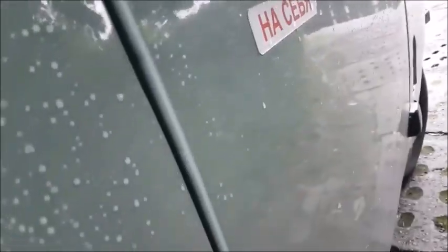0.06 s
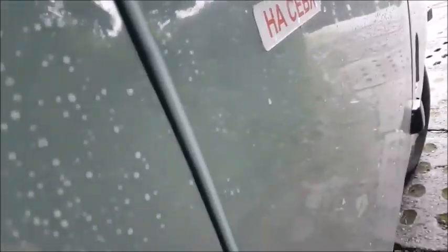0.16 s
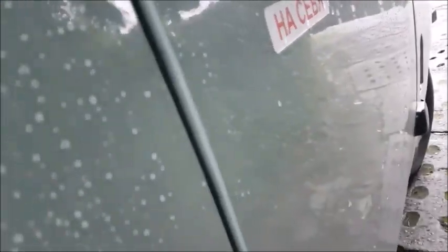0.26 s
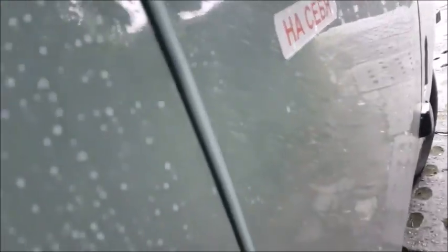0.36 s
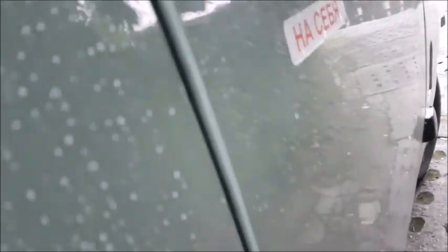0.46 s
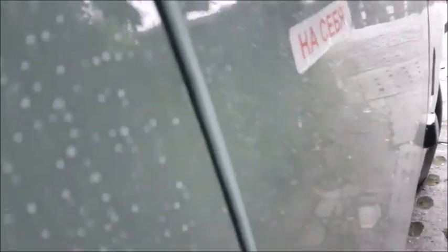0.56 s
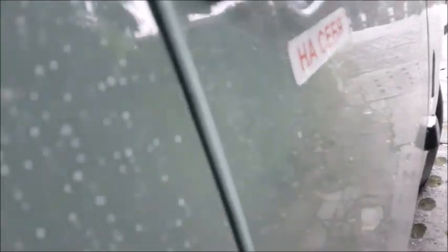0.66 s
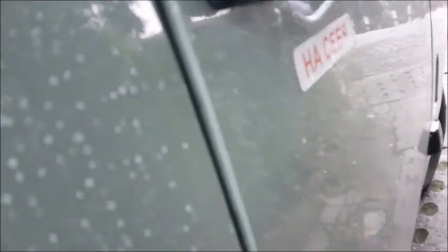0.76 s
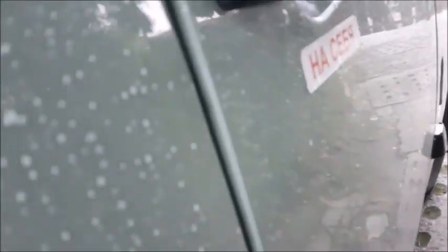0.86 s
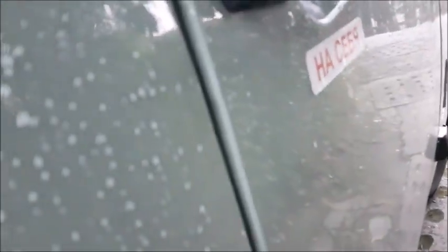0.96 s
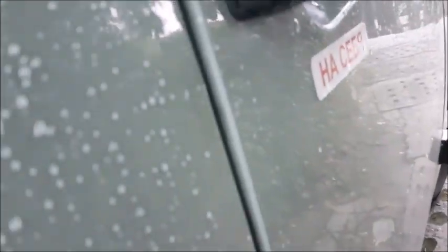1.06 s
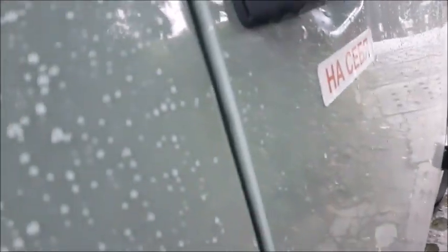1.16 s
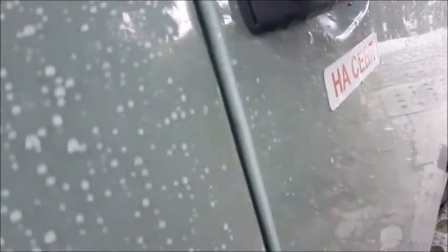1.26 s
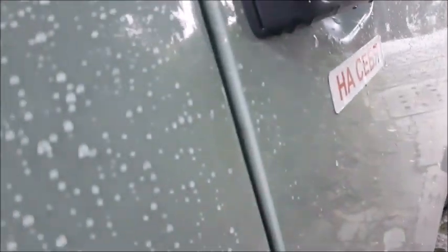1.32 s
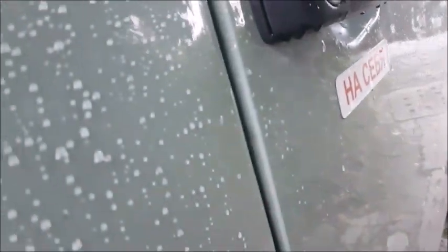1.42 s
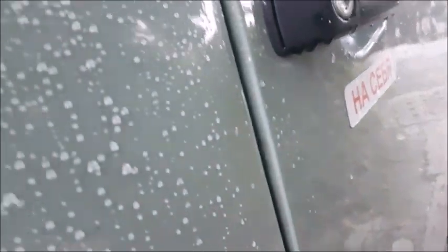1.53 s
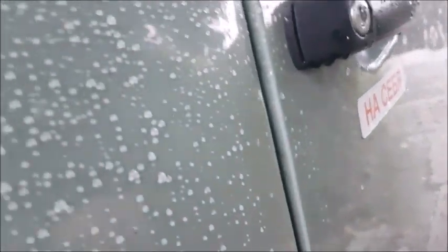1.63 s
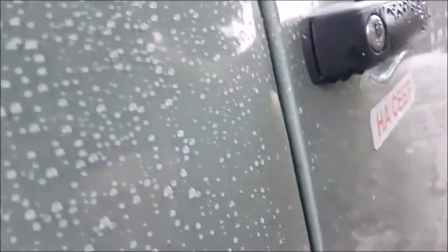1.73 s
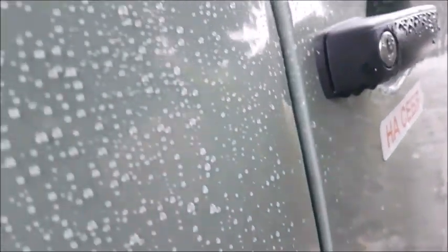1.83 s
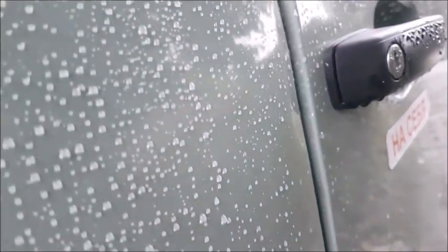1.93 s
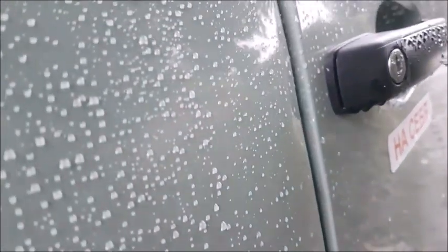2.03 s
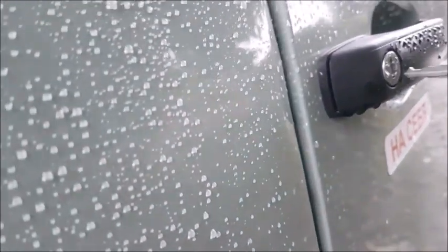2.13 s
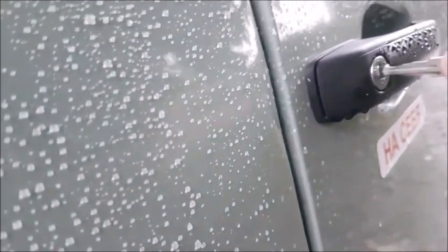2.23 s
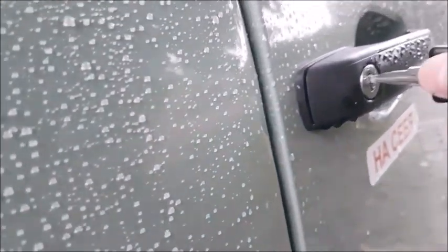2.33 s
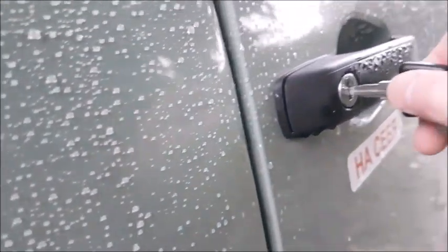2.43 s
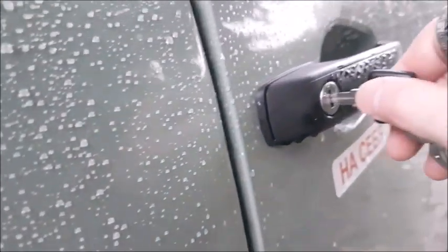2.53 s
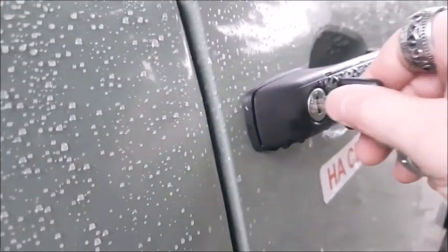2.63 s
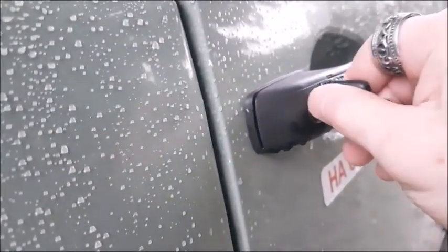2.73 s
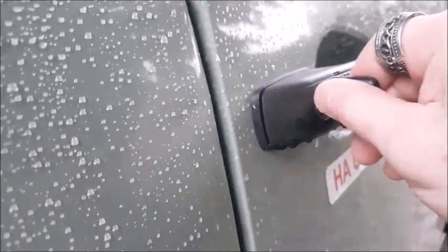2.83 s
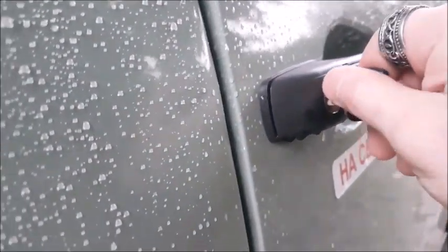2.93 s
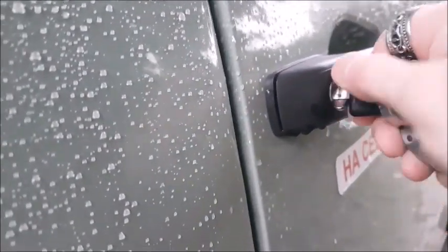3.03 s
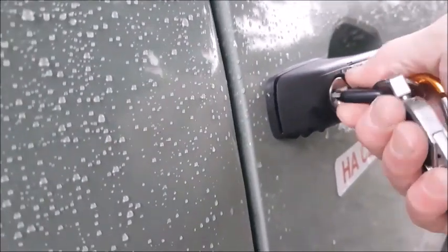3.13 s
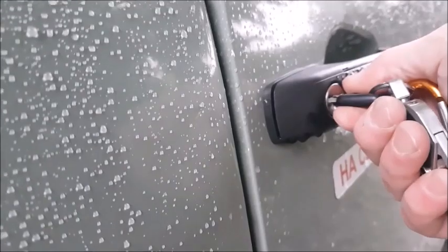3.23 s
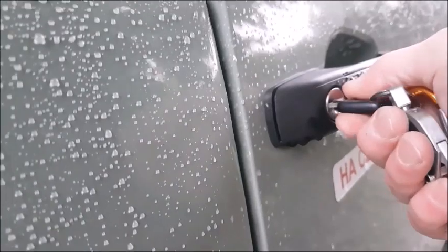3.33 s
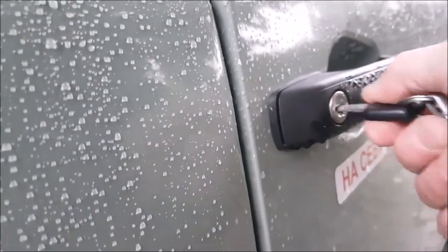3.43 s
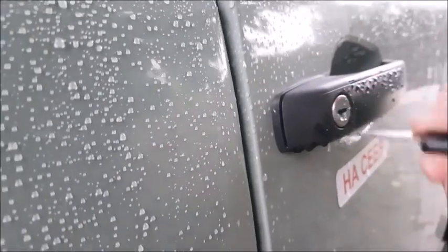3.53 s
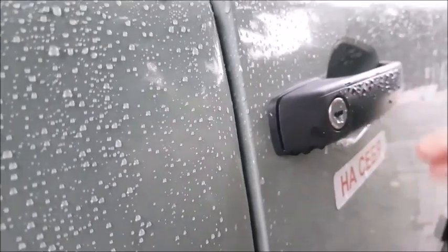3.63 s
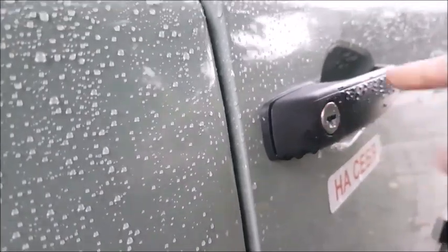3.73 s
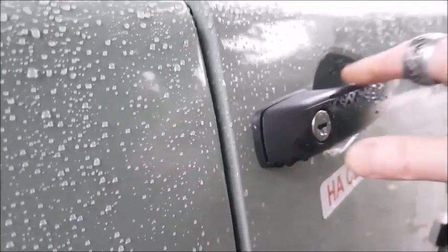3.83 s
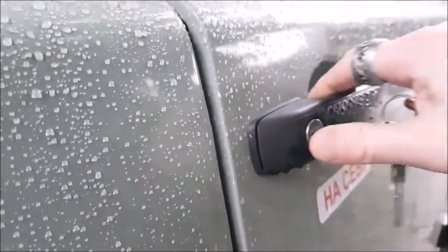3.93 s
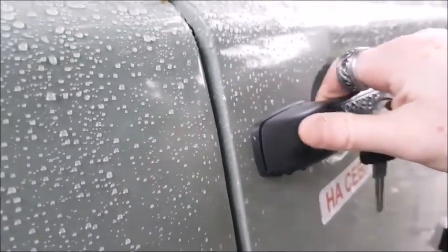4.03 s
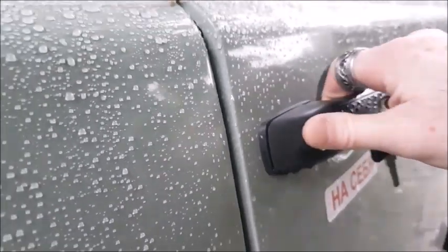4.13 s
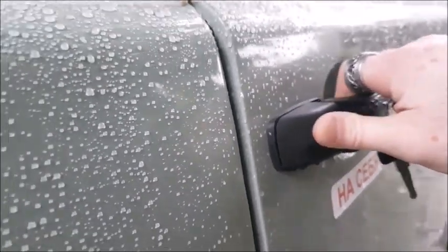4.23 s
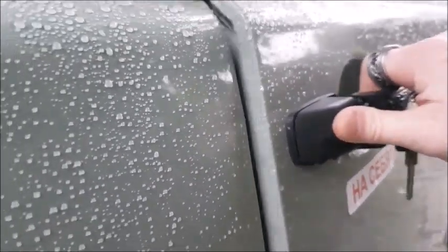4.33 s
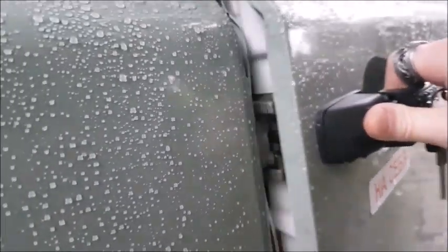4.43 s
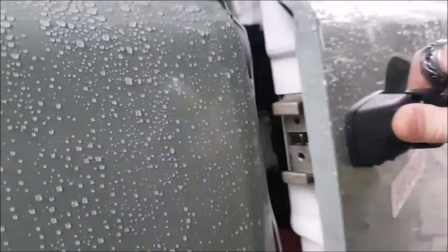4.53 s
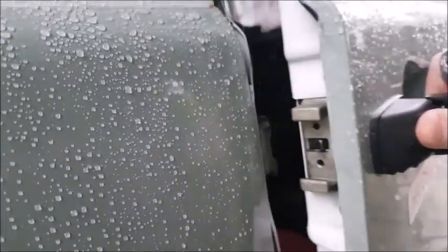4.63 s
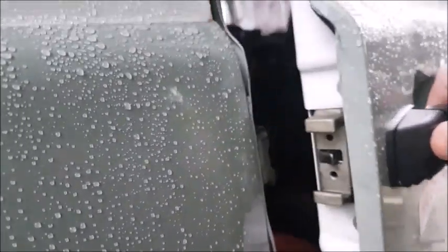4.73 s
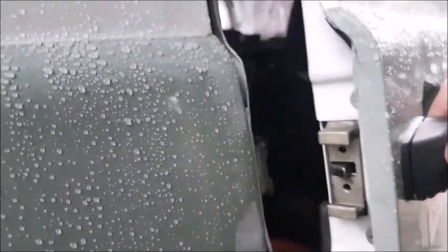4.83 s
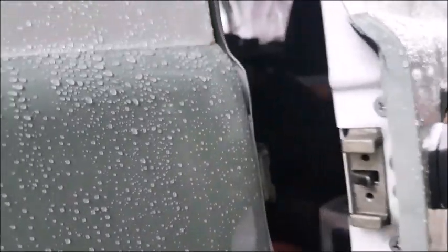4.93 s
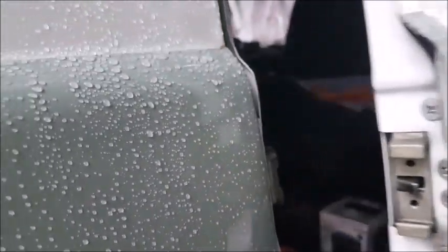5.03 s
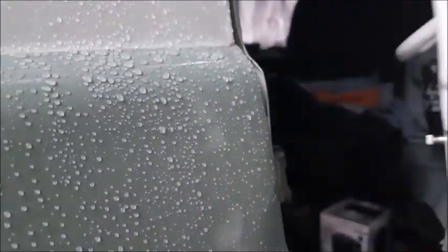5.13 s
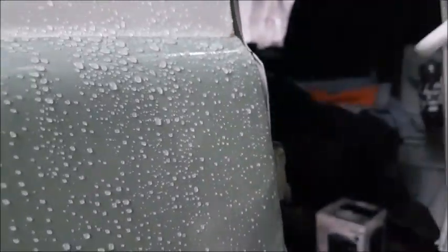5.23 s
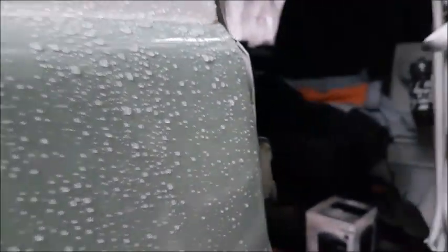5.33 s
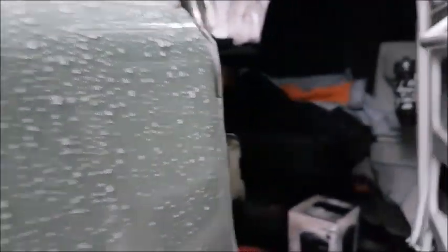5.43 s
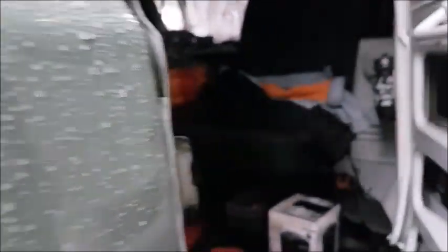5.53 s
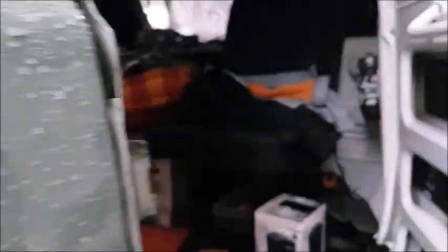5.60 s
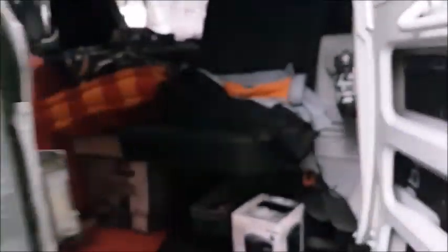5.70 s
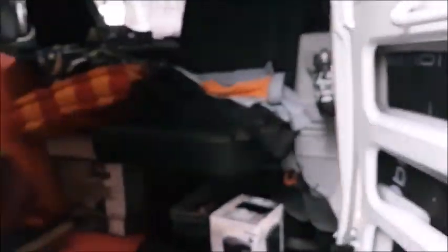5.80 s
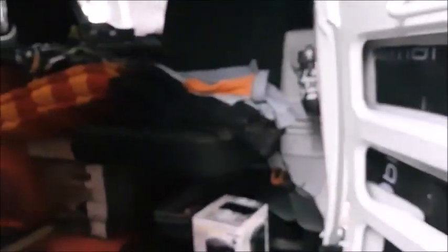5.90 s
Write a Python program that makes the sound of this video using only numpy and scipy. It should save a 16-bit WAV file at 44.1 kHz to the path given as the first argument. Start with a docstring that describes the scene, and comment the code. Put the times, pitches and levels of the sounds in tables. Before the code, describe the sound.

Outdoors over a low hum, a bunch of keys tinkles, a lock snaps hard, and a van door's latch clunks loose with rattles.

```python
"""A van's rear door outdoors: a key slides into its lock, turns and is pulled out, the handle is squeezed,
the latch clunks free and the door swings open. Blows ring the sheet-metal modes; small slips make the rubbing.
Before that a bunch of keys jingles, each touch a crack and a rattle ringing the keys' modes.
Faint swelling bands of noise make whistles, swishes and a blurred ring of the keys;
a low hum, a faint hiss and a few thin tones fill the background."""
import sys
import numpy as np
from scipy import signal
from scipy.fft import rfft, irfft
from scipy.io import wavfile
from scipy.ndimage import uniform_filter1d

SR = 44100
rng = np.random.default_rng(int(sys.argv[2]) if len(sys.argv) > 2 else 0)


def wav_record(signal):
    """Record a signal, one row per channel, as 16-bit PCM in the file named by sys.argv[1]."""
    frames = np.transpose(np.atleast_2d(signal))
    bounded = np.clip(frames, -1, 1)
    # unit amplitude maps onto the largest positive 16-bit level
    quanta = np.round(bounded * 32767).astype(np.int16)
    wavfile.write(sys.argv[1], SR, quanta)


N = 262836
TIME = np.arange(N) / SR  # s


def gain_of(db):
    """Turns dB into an amplitude factor."""
    return 10 ** (np.asarray(db) / 20)


def evened(x):
    """Brings a signal to an RMS of one."""
    return x / np.sqrt(np.mean(x ** 2) + 1e-20)


def read(points, hz):
    """Reads a curve of (Hz, value) points along a logarithmic pitch axis."""
    point_hz, value = np.transpose(points)
    return np.interp(np.log(hz + 1), np.log(point_hz + 1), value)


def at(points, seconds):
    """Reads a curve of (seconds, value) points along time."""
    return np.interp(seconds, *np.transpose(points))


def coloured(x, points):
    """Filters by a spectrum in dB."""
    hz = np.fft.rfftfreq(x.shape[-1], 1 / SR)
    return irfft(rfft(x) * gain_of(read(points, hz)), x.shape[-1])


def add(mix, start_s, pair, pan_db):
    """Lays a stereo sound into the mix, tilted by a left-right level difference."""
    part = mix[:, round(start_s * SR):][:, :pair.shape[1]]
    panned = pair * gain_of([[pan_db / 2], [-pan_db / 2]])
    part += panned[:, :part.shape[1]]


def pair_of(a, b, likeness):
    """The right port hears the left's signal by its likeness, and an independent one for the rest."""
    likeness = np.clip(likeness, 0, 1)
    return np.array([a, likeness * a + np.sqrt(1 - likeness ** 2) * b])


def fuzzy_tone(hz, width_hz, steady=0):
    """Noise through a narrow resonance that follows hz, around a steady core."""
    turn = np.exp(2j * np.pi * np.cumsum(hz) / SR)
    decay = np.exp(-np.pi * width_hz / SR)
    slow = rng.standard_normal(len(hz)) + 1j * rng.standard_normal(len(hz))
    for _ in range(2):
        slow = signal.lfilter([1 - decay], [1, -decay], slow)
    return evened((turn * (steady + slow / np.std(slow))).real)


# Blows on lock, handle and latch. Each row: start in seconds, then relative levels in dB of
# the middle (2 kHz), treble (7.5 kHz), body (500 Hz) and bass (120 Hz).
KNOCKS = [(2.246, -29.5, -35.5, -38.5, -36), (2.277, -34, -50, -42, -54), (2.2995, -45, -52, -39, -48),
          (2.377, -37.5, -76, -36, -53), (2.5306, -38.5, -57, -36.5, -59), (2.545, -47, -61, -45, -46),
          (2.5805, -36, -69, -48, -54), (2.5948, -65, -42, -58, -48.5), (2.7315, -25, -22, -21.5, -54),
          (2.7413, -5, -24, -17.5, -30), (2.7592, -20, -43, -24.5, -44), (2.8023, -23.5, -20.5, -37, -46),
          (2.811, -53.5, -29.5, -55, -58), (2.931, -42, -49.5, -49, -64), (2.9536, -41.5, -52, -40, -52),
          (3.0256, -48, -53, -74, -34.5), (3.1228, -35, -54, -41, -47), (3.2696, -50, -57, -64, -41),
          (3.2849, -44.5, -52.5, -44, -47), (3.3339, -43.5, -54, -52, -33), (3.3402, -30.5, -88, -30, -67),
          (3.4123, -25, -61, -32.5, -43), (3.4782, -34, -61, -36.5, -40.5), (3.5013, -26, -57, -36, -33.5),
          (3.5223, -37, -38, -38, -35), (3.5441, -37, -38, -49, -41.5), (3.6217, -43, -44.5, -76.5, -54),
          (3.7278, -46.5, -48.5, -76, -54.5), (3.8705, -47, -69, -61, -33.5),
          (3.969, -41, -75, -43.5, -50.5), (4.109, -25, -37.5, -76, -49), (4.1315, -43.5, -49, -38, -62),
          (4.144, -17, -44, -25, -67), (4.1603, -41, -60, -30.5, -43.5), (4.2017, -23.5, -40.5, -21, -20.5),
          (4.2808, -26.5, -56.5, -33.5, -31), (4.2959, -20, -45, -25, -14.5), (4.3086, -7, -24, -19, -18),
          (4.3155, -30, -28, -40, -40), (4.3254, -21, -40.5, -20.5, -24.5), (4.375, -27.5, -49, -31, -27.5),
          (4.3912, -28.5, -39.5, -32, -33.5), (4.4195, -56, -54, -48.5, -29),
          (4.4574, -45, -51, -37.5, -37.5), (4.5332, -45.5, -59.5, -36.5, -42),
          (4.7183, -19, -37.5, -39.5, -41.5), (4.8028, -37, -63, -39, -39.5),
          (4.8813, -26, -41, -46, -44.5), (4.909, -41, -73, -42, -58), (5.685, -41.5, -57, -51, -69),
          (5.8202, -42, -58, -46, -51), (5.8276, -40.5, -65, -38, -38)]
# Strong modes of the door. Each row: pitch in Hz, boost in dB.
DOOR_MODES = [(75, 0), (115, 5), (150, 7), (195, 11), (258, -14), (315, -4), (465, 11.5), (525, 6),
              (615, 10.5), (812, -2), (1150, 8), (1700, 0), (2240, 0)]
# Strength of the sheet metal's modes over pitch. Each row: pitch in Hz, relative level in dB.
PANEL_SPECTRUM = [(30, -9), (60, -5.5), (100, -5.5), (400, -5.5), (1200, -7), (2200, -4.5), (3000, -7),
                  (4300, 2), (5500, 2), (8000, 6.5), (10500, -5), (14000, 0)]
# Decay of the crack, and of the ring after it. Each row: pitch in Hz, time to fall 60 dB in seconds.
CRACK_T60 = [(30, 0.32), (200, .08), (700, 0.033), (2000, 0.013), (5000, 0.0058), (15000, 0.014)]
RING_T60 = [(30, 0.13), (200, 0.58), (700, 0.26), (2000, 0.1), (5000, 0.07), (15000, 0.085)]
# Ringing after the crack, more once the door hangs free. Each row: time in seconds, ring in dB.
RINGING = [(2.2, -16.5), (2.8, -16.5), (3.1, -7), (4.1, -12), (4.45, -7.5), (4.7, -3.5), (5.96, -3.5)]
# Where the blows sit. Each row: time in seconds, left over right in dB.
KNOCK_PAN = [(2.2, -3), (2.8, 1), (4.0, -1.5), (4.31, 1), (4.45, -5), (4.75, 1), (5.96, -4.5)]


def door():
    """The sheet metal has strong modes and a dense crowd of others; each blow cracks, rings and lands elsewhere."""
    out, t = np.zeros((2, N)), np.arange(SR // 3) / SR
    crowd_hz = np.geomspace(28, 15800, num=420) * rng.uniform(0.97, 1.01, size=420)
    strong_hz, strong_db = np.transpose(DOOR_MODES)
    hz = np.r_[crowd_hz, strong_hz]
    mode_db = read(PANEL_SPECTRUM, hz) + np.r_[0 * crowd_hz, strong_db]
    modes = gain_of(mode_db)[:, None] * np.sin(2 * np.pi * hz[:, None] * t)
    build_s = read([(60, 0.0091), (600, 0.00053), (5000, 0.00034)], hz)  # bass builds slowly
    modes *= 1 - np.exp(-t / build_s[:, None])
    crack = modes * gain_of(-60 * t / read(CRACK_T60, hz)[:, None])
    ring = modes * gain_of(-60 * t / read(RING_T60, hz)[:, None])
    likeness = read([(100, 1.0), (1000, 0.73), (5000, 0.48)], hz)
    fade = signal.windows.tukey(2 * len(t), .2)[len(t):]
    for start_s, mid_db, treble_db, body_db, bass_db in KNOCKS + pins(count=9):
        ring_db = at(RINGING, start_s)
        spectrum = [(25, bass_db - 15), (120, bass_db), (500, body_db),
                    (2000, mid_db), (7500, treble_db), (14000, treble_db - 3)]
        blow = gain_of(read(spectrum, hz))
        dulled = gain_of(ring_db + read([(60, 3.5), (300, 2.0), (3000, -1.5), (8000, -9.5)], hz))
        where = blow * pair_of(*rng.standard_normal((2, len(hz))), likeness)
        # the modes start partly in step, which gives the crack its sharp front
        sound = (where + 0.2 * blow) @ crack + dulled * where @ ring
        # blows at times of more ringing also build slower
        sound *= 1 - np.exp(-t / (0.0011 * gain_of(ring_db)))
        add(out, start_s, gain_of(-16) * sound * fade, at(KNOCK_PAN, start_s))
    return out


PINS_FROM_S, PIN_GAP_S, PIN_SCATTER_S = 2.633, 0.013, .003
PIN_DB, PIN_RISE_DB, PIN_SCATTER_DB = -46.5, 2, 2  # each pin a little harder than the last, on average
PIN_TREBLE_DB, PIN_BODY_DB, PIN_BASS_DB = -9, -2.5, 0  # over the middle


def pins(count):
    """The key's teeth ride over the lock pins: a run of ticks, as rows like the knocks."""
    k = np.arange(count)
    time_scatter, *level_scatter = rng.standard_normal((5, count))
    starts_s = PINS_FROM_S + PIN_GAP_S * k + PIN_SCATTER_S * time_scatter
    tilt_db = np.array([[0], [PIN_TREBLE_DB], [PIN_BODY_DB], [PIN_BASS_DB]])
    levels_db = PIN_DB + PIN_RISE_DB * k + tilt_db + PIN_SCATTER_DB * np.array(level_scatter)
    return list(zip(starts_s, *levels_db))


# Metal, fingers or seal rubbing on the door. Each row: start and end in seconds, body level in dB at start
# and at end, fizz over the body in dB at start and at end, rumble over the body in dB.
RUBS = [(2.24, 2.5, -62, -64, -20, -34, 9), (2.49, 2.75, -64.5, -44.5, -27, 1, 2.5),
        (2.81, 2.887, -63, -78, 15, -18, 8.5), (2.89, 3.203, -73, -50, -12, -13.5, 3.5),
        (3.408, 3.56, -48, -54, 3.5, 2, 11.5), (3.554, 3.665, -58, -66, -11, -13, 11),
        (3.86, 4.027, -64.5, -63.5, 7, -12, 11), (4.15, 4.29, -55, -59, -26, -26, -1),
        (4.316, 4.634, -42, -65, -13, -36, 5.5), (4.731, 5.0, -45.5, -67.5, -24, -31, -3),
        (5.63, 5.768, -70, -64.5, 3, 0, 2), (5.82, 5.952, -58, -73, -14, -22, -5)]
# Colours of the body, the fizz and the rumble. Each row: pitch in Hz, relative level in dB per Hz.
RUB_BODY = [(100, -29), (180, -6), (630, -4), (1000, -9), (1900, -14.5), (4000, -35), (6000, -50)]
RUB_FIZZ = [(1200, -27.5), (2500, -2.5), (8500, -5.5), (10500, -6), (13600, -4), (16000, -2)]
RUB_RUMBLE = [(15, -24), (35, -5), (80, 4), (130, 6.5), (200, -13.5), (300, -40.5)]
RUB_EDGE_S = .015  # fade at either end


def rubbing():
    """Dense small slips drive the door's body and a bright fizz; the shaken door rumbles under them."""
    strength = gain_of(3.9 * np.minimum(rng.exponential(1, N), 3))
    slips = strength * (rng.random(N) < 350 / SR)  # about 350 slips a second
    slip_decay = gain_of(-60 * np.arange(600) / SR / 0.0048)
    grain = evened(signal.oaconvolve(slips, slip_decay)[:N])
    a, b, c, d, e = rng.standard_normal((5, N))
    body = evened(coloured(pair_of(a, b, .9) * (1.4 + grain), RUB_BODY))
    fizz = evened(coloured(pair_of(c, d, 0.24) * (0.16 + grain), RUB_FIZZ))
    rumble = evened(coloured(e, RUB_RUMBLE))
    gains = np.zeros((3, N))
    for start, end, from_db, to_db, fizz_from_db, fizz_to_db, rumble_db in RUBS:
        inside = np.clip(np.minimum(TIME - start, end - TIME) / RUB_EDGE_S, 0, 1)
        db = np.interp(TIME, [start, end], [from_db, to_db])
        fizz_db = np.interp(TIME, [start, end], [fizz_from_db, fizz_to_db])
        gains += inside * gain_of([db, db + fizz_db, db + rumble_db])
    return body * gains[0] + fizz * gains[1] + rumble * gains[2]


# Balance of the door sounds between the ports. Each row: pitch in Hz, left over right in dB.
MIC_BALANCE = [(60, 5), (130, -1.5), (290, -1.5), (640, -2.5), (1410, -3), (3100, -6.5), (6820, -5.5),
               (15000, 4.5)]
# Phase between the ports. Each row: pitch in Hz, radians by which the left leads.
MIC_PHASE = [(400, 0), (1800, 1), (2500, 1), (3700, -1.5), (8000, -2), (16000, -2.5)]


def ports(x):
    """A near sound reaches the two microphone ports with a balance and a phase that change with pitch."""
    hz = np.fft.rfftfreq(N, 1 / SR)
    half = gain_of(read(MIC_BALANCE, hz) / 2) * np.exp(.5j * read(MIC_PHASE, hz))
    return irfft(rfft(x) * np.array([half, 1 / half]), N)


# Keys touching. Each row: start in seconds, relative level in dB, rattle after it in dB,
# left over right in dB, loudest ring in Hz.
JINGLES = [(0.204, -28, -26, -10, 3000), (0.2296, -37.5, -18, -7.5, 7800), (0.2776, -32.5, -10, -9, 2390),
           (0.293, -43, -15, 10, 7550), (0.56, -53, 5.5, -7, 7120), (0.5908, -40, 1, -2, 11900),
           (0.6084, -38.5, 1.5, -8, 4290), (0.6232, -38, -13, -5, 1990), (0.7178, -56, -10, 0, 5200),
           (0.768, -55, -16, -6, 2000), (0.8347, -57.5, 0, 2, 12300), (0.88, -45.5, 0.5, -1, 12400),
           (0.9025, -44, 0, -5.5, 4200), (1.0803, -37.5, -5, -4, 4470), (1.261, -41, 7.5, -3.5, 6830),
           (1.359, -48, 2.5, -2, 5430), (1.7664, -33, -4, -9.5, 6300), (1.7718, -37, -16, -9, 1980),
           (1.782, -37, 6, -5, 5300), (1.7974, -41, 3, -9, 4370), (1.8229, -42, 0.5, -12, 4250),
           (1.874, -53.5, 1.5, -9, 2020), (2.048, -48, -8, 0, 5080)]
# Modes the keys share. Each row: pitch in Hz before a small random shift, relative level in dB.
KEY_MODES = [(2000, -12), (3000, -5), (4300, -3.5), (4650, -5), (5300, -29), (6800, -5.5), (7300, 2.5),
             (7850, -2), (9000, -4.5), (10800, -14), (12000, 2), (12700, -17), (13600, 0)]
RATTLE_T60_S = 0.083
KEY_TREBLE_DB, TREBLE_DB_PER_OCTAVE = -12.5, 5  # a touch that rings higher is brighter


def keys():
    """Each touch is a short crack and a rattle of smaller touches, all ringing a different mix of the modes."""
    out, t = np.zeros((2, N)), np.arange(SR // 5) / SR
    lead = 200  # samples of silence ahead of each touch, room for the filter's spread
    mode_hz, mode_db = np.transpose(KEY_MODES)
    # a quick burst with a faint longer tail
    crack = (1 - np.exp(-t / 0.00046)) * gain_of(-60 * t / 0.015) + 0.056 * gain_of(-60 * t / 0.12)
    for start_s, db, rattle_db, pan_db, loudest_hz in JINGLES + sway(count=10):
        rattle = gain_of(rattle_db - 60 * t / RATTLE_T60_S) * rng.uniform(0.19, 1, len(t))
        touches = rattle * (rng.random(len(t)) < 400 / SR)  # about 400 a second
        touches[0] = 1
        hz = np.r_[mode_hz * rng.uniform(0.99, 1.04, len(mode_hz)), loudest_hz]
        struck_db = np.r_[mode_db, 4]
        t60s = 0.039 * rng.uniform(0.5, 1.8, len(hz))  # fingers and other keys damp each mode differently
        decays = gain_of(struck_db[:, None] - 60 * t / t60s[:, None])
        modes = decays * np.sin(2 * np.pi * hz[:, None] * t)
        ring = pair_of(*rng.standard_normal((2, len(hz))), 0.098) @ modes
        ring = signal.fftconvolve(ring, touches[None])[:, :len(t)]
        cracks = signal.fftconvolve(touches, crack)[:len(t)]
        cracks = cracks * pair_of(*rng.standard_normal((2, len(t))), 0.11)
        treble_db = KEY_TREBLE_DB + TREBLE_DB_PER_OCTAVE * np.log2(loudest_hz / 3500)
        tilt = [(600, -28), (1800, -6.5), (2600, -4.5), (5500, -5),
                (8000, treble_db + 2), (10000, treble_db - 3), (13500, treble_db)]
        padded = np.pad(cracks + gain_of(-12.5) * ring, ((0, 0), (lead, 0)))
        sound = coloured(padded, tilt)[:, :len(t)]
        add(out, start_s - lead / SR, gain_of(db + 4) * sound, pan_db)
    return out


SWAY_FROM_S, SWAY_TO_S, SWAY_DB = .9, 1.1, -58.5  # the level is the faintest touch's


def sway(count):
    """The swaying bunch ticks faintly at random moments, as rows like the jingles."""
    return [(SWAY_FROM_S + a * (SWAY_TO_S - SWAY_FROM_S), SWAY_DB + 4 * b, -3, -8 * c, 3000 * 4 ** d)
            for a, b, c, d in rng.random((count, 4))]


# Faint swelling bands of noise: whistles, swishes and a blurred ring of the keys. Each row: start and end
# in seconds, pitch in Hz, width in Hz, level in dB at the top of the swell, share of the time spent rising.
SWELLING_BANDS = [(1.446, 2.15, 1906, 1190, -71.5, 0.51), (1.721, 2.113, 2028, 350, -63, 0.27),
                  (1.778, 2.09, 2960, 403, -69, 0.58), (3.178, 3.34, 1700, 120, -67, 0.84),
                  (3.547, 3.757, 1676, 141, -63, .3), (5.046, 5.2, 1870, 706, -71.5, 0.55)]


def swelling_bands():
    """Each is a band of noise that swells and fades."""
    out = np.zeros((2, N))
    for start, end, hz, width_hz, db, rise in SWELLING_BANDS:
        u = np.linspace(0, 1, round((end - start) * SR))
        swell = np.interp(u, [0, np.clip(rise, .05, .95), 1], [0, 1, 0]) ** 0.64
        band = gain_of(db) * swell * fuzzy_tone(np.full(len(u), hz), width_hz)
        add(out, start, band * np.ones((2, 1)), -2.5)
    return out


# Likeness of the ports in the hum and hiss. Each row: pitch in Hz, likeness from 0 to 1.
AIR_LIKENESS = [(30, 1), (200, 0.93), (800, 0.19), (2000, 0.18), (6000, 0.1), (15000, 0.058)]
# Balance of the hum and hiss. Each row: pitch in Hz, left over right in dB.
AIR_BALANCE = [(60, 1), (150, 0), (380, -2), (950, -7.5), (2380, -1.5), (5980, -3), (15000, 2.5)]
# Delay between the ports in the background. Each row: time in seconds, samples by which the left lags.
AIR_LAG = [(0, 16.2), (1.4, 9.4), (1.8, 5), (5.96, 3.86)]


def wash(spectrum, level_db, size, patchy_db):
    """Random short-time spectra with drifting patches, under a slow level."""
    hop = size // 4
    frames, hz = N // hop + 5, np.fft.rfftfreq(size, 1 / SR)
    a, b, c, d, patches = rng.standard_normal((frames, len(hz), 5)).T
    patches = uniform_filter1d(patches, size=9, axis=0)
    patches = evened(uniform_filter1d(patches, size=9, axis=1))
    z = pair_of(a + 1j * b, c + 1j * d, read(AIR_LIKENESS, hz)[:, None])
    lag = at(AIR_LAG, np.arange(frames) * hop / SR)
    z[0] *= np.exp(-2j * np.pi * hz[:, None] * lag / SR)
    side_db = read(AIR_BALANCE, hz)[:, None] / 2
    z *= gain_of(read(spectrum, hz)[:, None] + patchy_db * patches + np.array([side_db, -side_db]))
    noise = signal.istft(z, nperseg=size, noverlap=size - hop)[1][:, :N]
    return evened(noise) * gain_of(level_db)


# Colour of the hum. Each row: pitch in Hz, relative level in dB per Hz.
HUM_SPECTRUM = [(15, -25.5), (30, -34), (50, -18.5), (75, -18.5), (90, -9.5), (110, 0), (130, -5.5),
                (160, -2.5), (200, -13.5), (230, -17), (265, -29), (400, -40), (600, -66)]
# Slow level of the hum. Each row: time in seconds, level in dB.
HUM_LEVEL = [(0.0, -51), (0.26, -48.5), (2.21, -49.5), (2.75, -43.5), (3.15, -52.5), (4.5, -45),
             (5.33, -55), (5.96, -58.5)]


def hum():
    """A low band of noise whose level drifts."""
    return wash(HUM_SPECTRUM, at(HUM_LEVEL, TIME), size=4096, patchy_db=1.5)


# Colour of the hiss. Each row: pitch in Hz, relative level in dB per Hz.
AIR_SPECTRUM = [(140, -29.5), (230, 0), (261, -24), (295, -12.5), (709, -15.5), (749, -9.5), (944, -20),
                (1350, -20.5), (3130, -26), (4470, -29.5), (5350, -33.5), (14800, -37.5), (16500, -43)]
AIR_DB, ECHO_DB, ECHO_T60_S = -63, -44, 0.59  # steady hiss; the blows' echo in it


def hiss():
    """Steady noise that swells after each blow in the knock table, as the yard throws it back."""
    blow_power = np.zeros(N)
    for start_s, db, *_ in KNOCKS:
        blow_power[round(start_s * SR)] = gain_of(db + ECHO_DB) ** 2
    echo_power = signal.lfilter([1], [1, -gain_of(-60 / ECHO_T60_S / SR) ** 2], blow_power)
    level_db = 10 * np.log10(gain_of(AIR_DB) ** 2 + echo_power)
    return wash(AIR_SPECTRUM, level_db, size=1024, patchy_db=0.5)


# Thin fuzzy tones. Each row: pitch in Hz, width in Hz, level in dB before it follows the hum.
TONES = [(105.7, 13, -54), (753.7, 15, -65), (836, 7.7, -84), (1335, 3.8, -95.5)]
# Moments where a thin tone swells. Each row: time of the top in seconds, pitch in Hz, level at the top in dB.
SWELLING_TONE = [(0.0, 665, -71), (0.36, 658, -68), (0.79, 668, -56.5)]
SWELL_DB_PER_S, FADE_DB_PER_S = 53, 63


def thin_tones():
    """Fuzzy tones follow the hum's level in part; pure ones swell and fade; the left port hears them late."""
    tones = sum(gain_of(db) * fuzzy_tone(np.full(N, hz), width_hz, steady=1.33)
                for hz, width_hz, db in TONES)
    hum_db = at(HUM_LEVEL, TIME)
    tones = tones * gain_of(0.31 * (hum_db - hum_db.mean()))
    for top_s, hz, db in SWELLING_TONE:
        slope_db = np.minimum(SWELL_DB_PER_S * (TIME - top_s), FADE_DB_PER_S * (top_s - TIME))
        tones += np.sin(2 * np.pi * hz * TIME) * gain_of(db + slope_db)
    late = np.interp(TIME - at(AIR_LAG, TIME) / SR, TIME, tones)
    return np.array([late, tones]) * gain_of([[-1.5], [1.5]])


def scene():
    """The door through the microphone ports, the keys, the swelling bands and the background."""
    near = ports(door() + rubbing())
    background = hum() + hiss() + thin_tones()
    return near + keys() + swelling_bands() + background


EDGE_HZ = 15900


def record(dry):
    """The band limit: a steep low-pass."""
    low_pass = signal.firwin(511, EDGE_HZ, window=("kaiser", 9), fs=SR)
    return signal.oaconvolve(dry, low_pass[None], "same")


dry = scene()
out = record(dry)
wav_record(out)
```